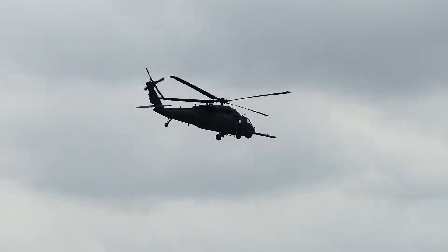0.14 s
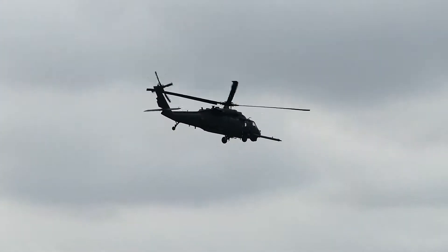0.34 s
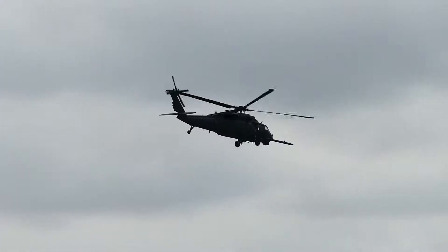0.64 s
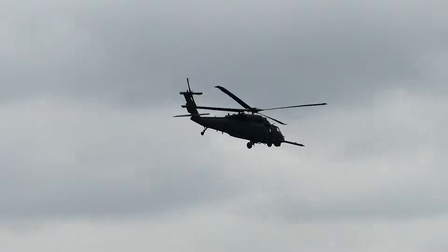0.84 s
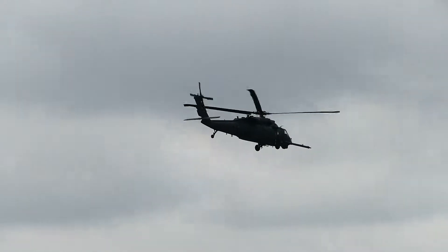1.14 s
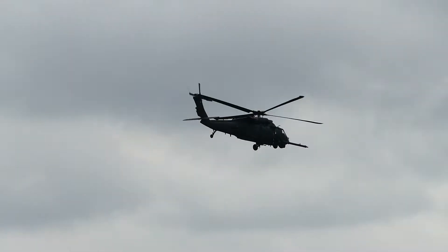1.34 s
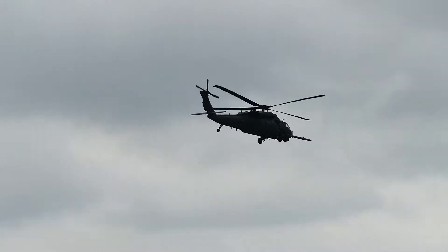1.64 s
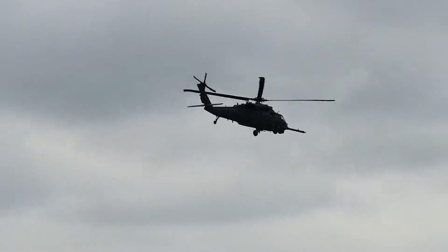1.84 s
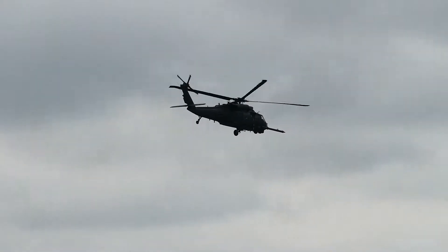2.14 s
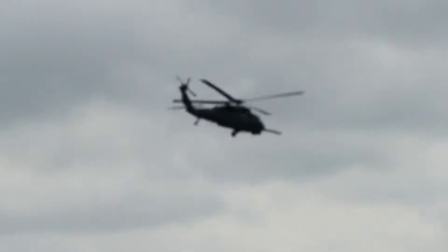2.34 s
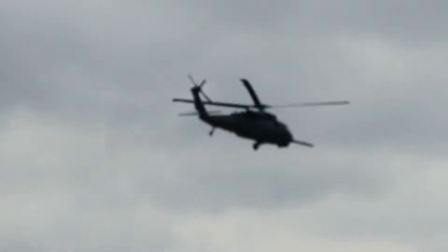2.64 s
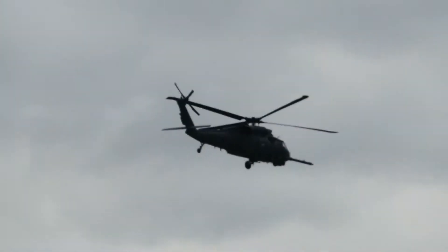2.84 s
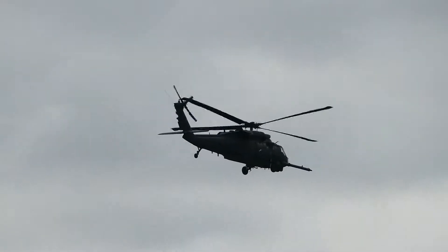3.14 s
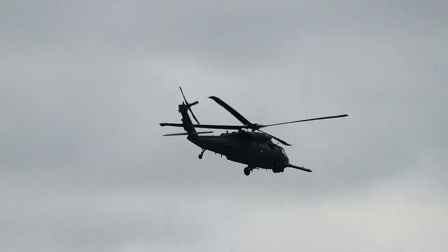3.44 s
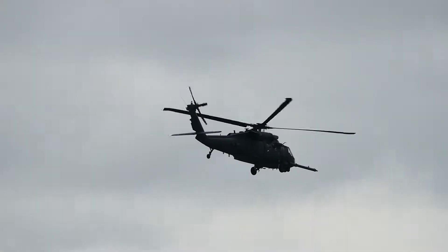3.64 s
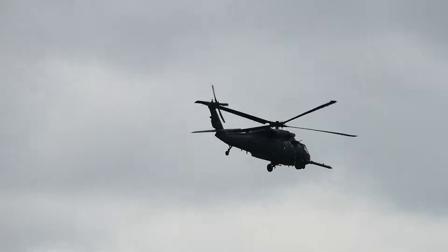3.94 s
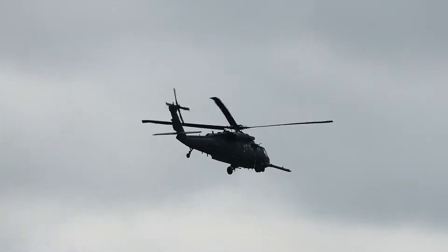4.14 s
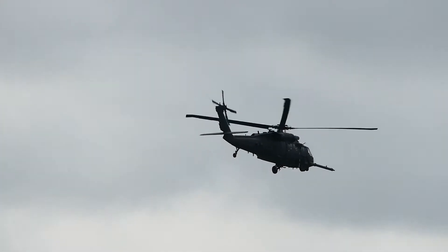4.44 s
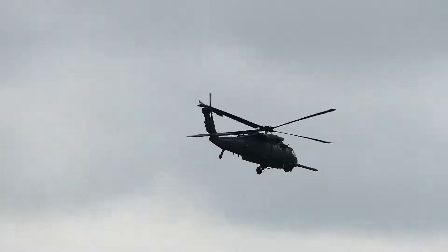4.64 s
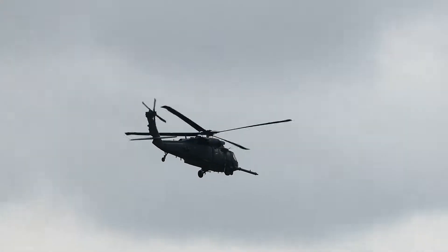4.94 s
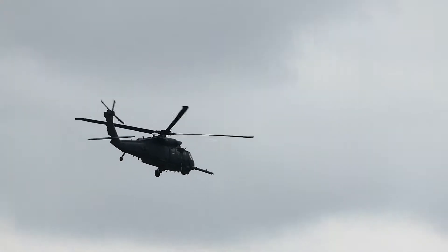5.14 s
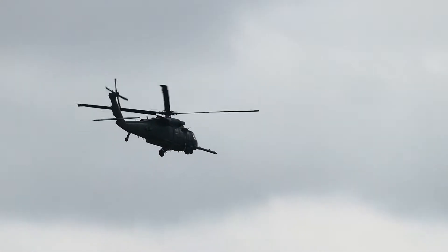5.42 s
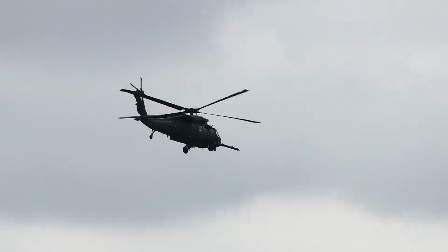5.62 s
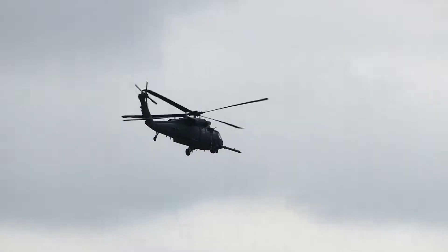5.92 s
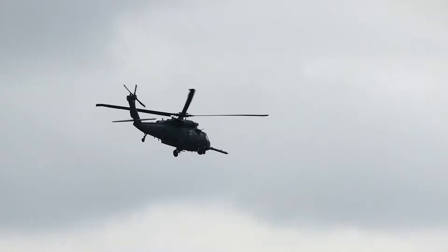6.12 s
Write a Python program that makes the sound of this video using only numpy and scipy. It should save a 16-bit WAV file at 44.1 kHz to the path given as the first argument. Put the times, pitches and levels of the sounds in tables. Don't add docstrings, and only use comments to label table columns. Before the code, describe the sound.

A helicopter's rotor roar throbs steadily and fades outdoors, with faint whines, blade slaps, nearby camera shutter clicks and a sharp knock of a zoom stop.

```python
import sys
import numpy as np
from scipy import signal
from scipy.fft import rfft, irfft, next_fast_len
from scipy.io import wavfile

SR = 44100
rng = np.random.default_rng(int(sys.argv[2]) if len(sys.argv) > 2 else 0)


def natural_amplitude(level_db):
    exponent = np.asarray(level_db, float) / 20
    return 10 ** exponent


def digitize_waveform(pressure):
    field = np.atleast_2d(pressure).T
    bounded = np.clip(field, -1, 1)
    quanta = np.round(bounded * 32767).astype(np.int16)
    wavfile.write(sys.argv[1], SR, quanta)


N = 276948

# time in seconds, roar level in dB, clearness in dB.
AIR_PATH = [(0, -21.5, -0.5), (.14, -22.5, -0.5), (.3, -19, -1), (.48, -22, 0), (.7, -25, -1.5),
            (1.05, -24.5, 2), (1.32, -23.5, -5), (1.85, -22.5, 4), (2.5, -25, 0.5), (3.2, -29, 1),
            (3.9, -21, 1), (4.11, -21.5, -0.5), (4.18, -28, -2), (4.36, -33, 9), (4.6, -33, 3.5),
            (5.05, -32.5, 3), (5.55, -24.5, -0.5), (6.28, -24.5, -2.5)]
AIR_MEAN_DB, MIDDLE_S = -26.5, 3.14
# pitch in Hz, level in dB per Hz.
ROAR_COLOUR = [(100, -60), (150, -39), (200, -17.5), (240, -9.5), (290, -5.5), (340, 1), (520, 0),
               (680, -5), (800, -6.5), (1370, -9), (2030, -15.5), (2500, -22.5), (4200, -25.5), (4900, -36),
               (6000, -49.5), (7200, -64.5), (9000, -96.5)]
# pitch in Hz, share of fading, share of clearness,
# change with distance in dB per second, change in the shadow in dB.
AIR_RESPONSE = [(250, 0.65, 0.01, -2, -25), (418, 0.88, 0.01, 0.08, -0.5), (617, 0.88, .15, -.5, -6.5),
                (746, 0.63, 0.22, -0.2, -8.5), (1220, 0.93, 1, -0.1, 3.5), (2000, 0.6, 0.89, 0.23, -2.5),
                (3300, 0.7, 0.59, -0.24, 7), (4180, 0.23, 0.37, 0.1, -1.5), (5630, 0.3, 0.5, -0.5, -2.5)]
# time in seconds, half length in seconds, lift in dB.
TREBLE_EDDIES = [(.42, .1, 3), (.8, 0.1, 1), (1.1, .08, -2), (1.35, 0.13, 3), (2.25, 0.065, 0),
                 (2.55, 0.29, -1), (3.5, .15, -0.5), (4.72, 0.088, -1.5), (5.2, .1, -2), (5.5, 0.23, 3),
                 (5.95, 0.21, -3)]
# time in seconds, half length in seconds, lift in dB.
LOW_EDDIES = [
    (.05, .15, -2),
    (.45, 0.083, 2),
    (1.1, 0.084, 0),
    (1.55, 0.36, 3),
    (4.1, .06, 0),
    (4.35, .1, 5.5),
    (5.3, .2, 3),
    (5.75, 0.6, -3),
]
BASS_TOP_HZ = 480
# time in seconds, half length in seconds,
# pitch in Hz, half width in octaves, lift in dB.
ROAR_PATCHES = [(1.85, 0.2, 2550, 0.36, -2.5), (2, .15, 1600, .2, -1), (3.98, .1, 390, .3, -2),
                (1.8, .15, 760, .25, 2.5), (1.1, .12, 560, .25, 3), (5.7, .12, 260, .25, -4),
                (2.33, .15, 780, 0.33, 3.5), (2.25, .15, 1650, .3, 2.5), (1.9, 0.13, 270, .3, -1),
                (4.4, .2, 1800, .2, 2.5), (4.4, 0.29, 3150, .2, 4.5), (5.2, .2, 500, .8, 0.5),
                (4.78, .1, 680, .25, -6), (4.6, .08, 700, .25, -5), (4.75, .1, 1900, .3, -4),
                (4.72, .08, 270, .3, 15), (7.6, .12, 240, .2, -4), (5.2, .3, 3400, 0.39, -3),
                (6.0, .2, 260, .3, 2), (6.0, .2, 620, 0.27, -2), (0.27, .15, 640, 0.33, 0),
                (1.25, .15, 1200, 0.28, 4.5), (0.15, .15, 510, 0.28, 1)]
# time in seconds, half length in seconds, change in dB.
INTAKES_COVERED = [
    (2.95, 0.46, -18),
]
INTAKE_HZ, INTAKE_OCTAVES, INTAKE_SHARE = 3800, 0.11, 0.44
HAZE_FROM_S, HAZE_DB_PER_S = 4.26, -5


def roar(patch_db, flicker_db, flutter_db, treble_lead):
    shaped, hz, size = coloured(ROAR_COLOUR)
    roar_db, clear_db = in_time(AIR_PATH)
    clear_db = clear_db + swells(TREBLE_EDDIES)
    bass_db = swells(LOW_EDDIES)
    law_hz, *laws = np.transpose(AIR_RESPONSE)
    depth_db = in_time(BLADE_THROB)[1] * natural_amplitude(3.0 * drift(7.0))
    turns, elapsed, shade = blade_turns(), seconds() - MIDDLE_S, shadow()
    haze_db = HAZE_DB_PER_S * np.maximum(seconds() - HAZE_FROM_S, 0)
    hidden_db = INTAKE_SHARE * swells(INTAKES_COVERED)
    pockets_db = np.array([swells([(s, half, db)]) for s, half, at_hz, octaves, db in ROAR_PATCHES])
    pocket_hz, pocket_octaves = np.transpose(ROAR_PATCHES)[2:4]
    out, gust, neighbour = np.zeros(N), drift(30.0), drift(4.0)
    for centre in 100 * 2 ** np.arange(0, 6.5, 1 / 3):
        window = np.cos(np.pi / 2 * np.clip(3 * np.log2(hz / centre), -1, 1)) ** 2
        fades, clears, loses, shaded_db = (np.interp(np.log(centre), np.log(law_hz), law) for law in laws)
        path_db = fades * (roar_db - AIR_MEAN_DB) + clears * clear_db
        path_db += loses * elapsed + shaded_db * shade
        path_db += np.clip(2 * np.log2(centre / INTAKE_HZ), 0, 1) * haze_db
        path_db += np.exp(-(np.log2(centre / INTAKE_HZ) / INTAKE_OCTAVES) ** 2) * hidden_db
        path_db += np.clip(2 * np.log2(BASS_TOP_HZ / centre) + 1, 0, 1) * bass_db
        path_db += np.exp(-(np.log2(centre / pocket_hz) / pocket_octaves) ** 2) @ pockets_db
        treble = np.clip(np.log2(centre / 650), 0, 2)
        throb_db = depth_db * (1 - 0.39 * treble) * np.cos(2 * np.pi * (turns + treble_lead * treble))
        own = drift(1.9)
        flutter = np.roll(gust, int(40 * centre))
        air_db = patch_db * (own + neighbour) + flicker_db * gust + flutter_db * flutter
        out += natural_amplitude(path_db + throb_db + air_db) * irfft(shaped * window, size)[:N]
        neighbour = own
    return natural_amplitude(AIR_MEAN_DB - 1.0) * out


# time in seconds, lead in blade periods, throb depth in dB.
BLADE_THROB = [(0, .12, 1.2), (1, .27, 1.6), (2, .4, 1.2), (3, .5, .8), (4, .47, 1.0), (5, .35, 1.2),
               (6.28, .17, .9)]
BLADE_HZ = 16.2


def blade_turns():
    return BLADE_HZ * seconds() + in_time(BLADE_THROB)[0]


SHADOW_S, SHADOW_FALL_S, SHADOW_HOLD_S, SHADOW_LIFT_S = 4.64, 0.045, 0.15, 1


def shadow():
    after = seconds() - SHADOW_S
    lift = 1 - (after - SHADOW_HOLD_S) / SHADOW_LIFT_S
    return np.clip(np.minimum(after / SHADOW_FALL_S, lift), 0, 1)


# time in seconds, first gap in Hz, strength from 0 to 1.
GROUND_ECHO = [(0, 655, 0.06), (.55, 670, 0.15), (.9, 783, 0.26), (1.5, 857, 0.17), (2, 825, 0),
               (2.5, 950, 0.09), (3.1, 930, 0.15), (3.7, 968, 0.2), (4.0, 900, 0.22), (4.5, 942, 0.18),
               (4.7, 792, 0.06), (5.3, 870, 0.15), (5.9, 805, 0.14), (6.28, 670, .2)]


def ground(x, dull_hz):
    gap_hz, strength = in_time(GROUND_ECHO)
    dull = signal.sosfilt(signal.butter(1, dull_hz, fs=SR, output="sos"), x)
    lag = SR / gap_hz - SR / (2 * np.pi * dull_hz)
    echo = np.interp(np.arange(N) - lag, np.arange(N), dull)
    return (x - strength * echo) / np.sqrt(1 + strength ** 2)


# side-on level in dB, share of fading, change tail-on in dB.
WHINE_LEVELS = [
    (-34.5, 1.75, -3),
    (-51.5, 0.13, 0),
    (-59.5, 0.3, 5),
]
# pitch in Hz, width in Hz.
WHINE_PITCHES = [
    (592, 81),
    (2700, 220),
    (4300, 190),
]
# side-on level in dB, share of fading, change tail-on in dB.
EXHAUST_LEVELS = [
    (-63.5, 0.14, 24),
    (-56, 0.1, 14.5),
    (-64, 0.43, 14),
]
# pitch in Hz, width in Hz.
EXHAUST_PITCHES = [
    (450, 57),
    (1260, 200),
    (1480, 210),
]
TURN_S, TURN_TAKES_S = 2.33, 0.16


def whines(pitches, levels):
    fading_db = in_time(AIR_PATH)[0] - AIR_MEAN_DB
    tail_on = (1 + np.tanh((seconds() - TURN_S) / TURN_TAKES_S)) / 2
    out = []
    for (hz, width), (side_db, fades, turn_db) in zip(pitches, levels):
        level_db = side_db + fades * fading_db + turn_db * tail_on + 0.28 * drift(7.8)
        out.append(natural_amplitude(level_db) * narrow_noise(hz, width))
    return out


# pitch in Hz, width in Hz, level in dB, loudest time in seconds, # half length in
# seconds.
PASSING_HUMS = [(347, 40, -37.5, 1.1, 0.62), (944, 22, -40.5, 0.48, 0.77), (1120, 90, -36, .95, 0.25),
                (1817, 220, -40, 0.74, 0.35), (1857, 190, -39, 1.45, 0.25), (2040, 130, -42, 1.95, 0.17),
                (1376, 140, -38.5, 2.9, 0.56), (2134, 100, -44.5, 4, 0.1), (1280, 130, -46.5, 5.5, 0.2),
                (1260, 140, -37.5, 6.7, 0.25), (3270, 120, -52, 1.8, 0.46), (1000, 220, -39.5, .4, .12),
                (930, 180, -41.5, 6.2, .12)]


def passing_hums():
    out = np.zeros(N)
    for hz, width, db, s, half in PASSING_HUMS:
        swell = np.exp(-((seconds() - s) / half) ** 2)
        out += natural_amplitude(db) * swell * narrow_noise(hz, width)
    return out


# multiple of the tail blade rate, level in dB rms.
TAIL_TONES = [
    (1, -72.5),
    (2, -59.5),
    (3, -42.5),
    (4, -44.5),
]
# time in seconds, level in dB.
TAIL_LEVEL = [(0, -2), (2.1, -3.5), (2.6, -10), (6.28, -32)]
TAIL_HZ = 75.4


def tail_rotor():
    turns = np.cumsum(TAIL_HZ * (1 + .002 * drift(1.5))) / SR
    hum = np.zeros(N)
    for multiple, db in TAIL_TONES:
        tone = np.sqrt(2) * np.sin(2 * np.pi * multiple * turns)
        hum += natural_amplitude(db + 1.8 * drift(2.5)) * tone
    return natural_amplitude(in_time(TAIL_LEVEL)[0]) * hum


# time in seconds, peak in dB.
WAKE_SLAPS = [(0.009, -11), (0.096, -8), (0.118, -17), (0.163, -19), (0.201, -10.5), (0.243, -8.5),
              (0.304, -13), (0.339, -17), (0.402, -20), (0.484, -17), (0.547, -15), (0.604, -17),
              (0.667, -15), (0.735, -13.5), (0.844, -15), (0.957, -16), (1.047, -12.5), (1.072, -14),
              (1.152, -15.5), (1.214, -17), (1.64, -14), (1.749, -10), (1.894, -19), (2.074, -13),
              (3.92, -22), (4.005, -18), (4.104, -16)]
SLAP_HZ, SLAP_WIDTH_HZ, SLAP_RISE_S, SLAP_DB = 599, 56, .004, -6.5


def slaps():
    pushes = np.zeros(N)
    for s, peak_db in WAKE_SLAPS:
        pushes[round(s * SR)] = natural_amplitude(peak_db + SLAP_DB)
    rung = resonate(pushes + 1e-18, SLAP_HZ, SLAP_WIDTH_HZ)
    softened = resonate(rung, SLAP_HZ, 1 / SLAP_RISE_S)
    return softened * SR / (2 * np.pi * SLAP_WIDTH_HZ) * 2


# time in seconds, peak in dB, pitch in Hz.
EXHAUST_CRACKS = [(0.0618, -19, 1050), (0.2324, -17, 1165), (0.2823, -16, 964), (0.3257, -16, 1060),
                  (0.3556, -17, 1040), (0.404, -19.5, 1200), (0.4753, -13, 1160), (0.6579, -20, 969),
                  (0.6913, -20, 953), (0.7233, -20, 999), (0.9123, -20, 1110), (0.9632, -12.5, 1110),
                  (1.0944, -20, 1100), (1.1458, -18, 1220), (1.4551, -21.5, 1060), (1.502, -21.5, 1120),
                  (1.5668, -20.5, 1096), (1.6462, -20.5, 1130), (1.8816, -13, 993), (1.9455, -16.5, 1010),
                  (2.0014, -15, 1270), (2.1335, -18.5, 1410), (2.1829, -16, 950), (2.5411, -20.5, 1350),
                  (2.6778, -22, 1340), (2.7232, -18.5, 1330), (2.8779, -20.5, 1250), (2.9128, -21, 1290),
                  (2.9592, -22.5, 1250), (3.0076, -20.5, 1160), (3.0759, -21.5, 1490),
                  (3.1687, -19.5, 1370), (3.2839, -24, 1330), (3.3633, -21, 940), (3.475, -20.5, 960),
                  (3.5468, -19.5, 1420), (3.7304, -15.5, 1435), (4.1061, -12.5, 1230),
                  (4.2273, -22.5, 1120), (4.3435, -19, 1260), (4.4164, -19, 1520), (4.4817, -21.5, 1540),
                  (4.5176, -23.5, 1430), (4.7277, -24, 1240), (4.8638, -25, 1240), (5.228, -20, 1220),
                  (5.2769, -21.5, 1420), (5.3248, -21.5, 1320), (5.3911, -19.5, 1260), (5.5423, -17, 1355),
                  (5.7304, -18, 1220), (5.9903, -22.5, 1280)]
CRACK_WIDTH_HZ, CRACK_DB = 260, -4.5
# time in seconds, peak in dB, pitch in Hz.
TAIL_THUMPS = [(2.166, -19, 458), (2.312, -20, 563), (2.382, -14, 410), (2.783, -16.5, 370),
               (2.926, -19, 377), (3.102, -19, 374), (3.297, -20, 458), (3.343, -20, 476),
               (3.391, -17.5, 388), (3.461, -15, 414), (3.546, -13, 610), (3.593, -20, 498),
               (3.675, -21.5, 466), (3.739, -15, 474), (3.78, -10.5, 557), (3.891, -14, 528),
               (3.956, -11.5, 371), (4.005, -12, 458), (4.235, -20, 366), (4.296, -19, 470),
               (4.463, -16, 460), (4.681, -30, 470), (5.334, -23, 406), (5.397, -22, 560),
               (5.437, -14, 504), (5.559, -18, 560), (5.674, -22, 584), (5.714, -22, 510),
               (5.783, -14.5, 600), (5.838, -17, 586), (5.888, -19.5, 466), (5.987, -21, 425),
               (6.043, -18, 458), (6.115, -21, 410), (6.2, -25, 458), (6.245, -18, 490)]
THUMP_WIDTH_HZ, THUMP_DB = 82, -7
# time in seconds, peak in dB.
TIP_SNAPS = [
    (3.909, -27.5),
    (3.9544, -29),
    (4.1044, -28.5),
    (4.2316, -29.5),
    (4.2959, -27),
    (4.3535, -26),
    (4.4095, -29),
    (4.6074, -29.5),
    (4.7274, -33.5),
]
TIP_LOW_HZ, TIP_HIGH_HZ, TIP_T60_S, TIP_DB = 1800, 4200, 0.021, -3


def cracks():
    span = np.arange(2000) / SR
    out = np.zeros(N + len(span))
    low_cut = signal.butter(2, TIP_LOW_HZ, "high", fs=SR, output="sos")
    top_cut = signal.butter(8, TIP_HIGH_HZ, fs=SR, output="sos")
    band = np.vstack([low_cut, top_cut])
    for s, peak_db in TIP_SNAPS:
        puff = rng.standard_normal(len(span)) * natural_amplitude(-60 * span / TIP_T60_S)
        at = round(s * SR)
        out[at:at + len(span)] += natural_amplitude(peak_db + TIP_DB) * signal.sosfilt(band, puff)
    exhaust_cracks = rings(EXHAUST_CRACKS, CRACK_WIDTH_HZ, CRACK_DB)
    return out[:N] + exhaust_cracks + rings(TAIL_THUMPS, THUMP_WIDTH_HZ, THUMP_DB)


def rings(events, width_hz, lift_db):
    span = np.arange(2000) / SR
    out = np.zeros(N + len(span))
    decay = np.pi * width_hz * span
    envelope = np.e * decay * np.exp(-decay)
    for s, peak_db, hz in events:
        at = round(s * SR)
        out[at:at + len(span)] += natural_amplitude(peak_db + lift_db) * envelope * np.sin(2 * np.pi * hz * span)
    return out[:N]


RELEASES = [
    .0687,
    .4068,
    .7447,
]
# seconds after release, peak in dB, share of low modes in dB,
# time to die by 60 dB in seconds.
SHUTTER_CYCLE = [(0, -45, -13, 0.016), (0.015, -37.5, -3, 0.012), (.0225, -41, 1, 0.012),
                 (.03, -59, -2, .015), (0.043, -36, -1.5, 0.011), (0.0516, -43.5, -2.5, 0.012),
                 (.062, -54, 0, 0.071), (.071, -50, -2, 0.011), (.080, -53, 0, 0.033),
                 (.085, -38.5, -3, 0.012), (.098, -57, -4, 0.021), (0.105, -48, -4.5, .012)]
# pitch in Hz, width in Hz, level in dB.
CAMERA_MODES = [(4020, 570, 19), (4800, 960, 15), (5720, 510, 12), (8730, 500, 0.5), (10100, 600, 0),
                (11200, 800, -2.5), (12500, 1000, -12), (14300, 1500, -19)]


def camera():
    events = [(s + lag, *rest) for s in RELEASES for lag, *rest in SHUTTER_CYCLE]
    return ticks(events, CAMERA_MODES, lift_db=6.5, snap=2.2)


# time in seconds, peak in dB, share of low modes in dB,
# time to die by 60 dB in seconds.
BUTTON_CLICKS = [(1.6228, -35, -3, 0.012), (1.742, -44, -15, 0.01), (1.7506, -44, 8.5, 0.0073),
                 (1.9609, -43.5, -3, 0.012), (1.974, -64, -8.5, 0.01), (2.1495, -56, -18, 0.01),
                 (2.2465, -40.5, -8, 0.011), (2.2495, -30, -12, 0.022), (2.3054, -37, -24, 0.01),
                 (2.3316, -37.5, -5, 0.01), (2.3464, -48.5, -11, 0.01), (2.9687, -39.5, -38, 0.01),
                 (3.0097, -46, -11, 0.0087), (3.2744, -57, -12.5, 0.01), (4.4707, -46, -9, 0.013),
                 (4.8145, -48, -16, 0.0092), (5.2565, -59.5, -8.5, 0.01), (5.2653, -62.5, 7.5, 0.011)]
# time in seconds, peak in dB, share of low modes in dB,
# time to die by 60 dB in seconds.
STOP_RATTLE = [
    (3.1692, -41, -12, .02),
    (3.1812, -26, -25, .011),
    (3.1855, -23, -25, .004),
]
# pitch in Hz, width in Hz, level in dB.
CASING_MODES = [(3400, 1550, 15.5), (4740, 560, 4.5), (5970, 380, 4), (9500, 590, -9.5), (9950, 830, 3.5),
                (10800, 980, 1.5), (13050, 2000, -9), (15000, 1800, -14.5)]
# pitch in Hz, level in dB per Hz.
RUB_COLOUR = [(5000, -44), (6900, -33.5), (7700, -28.5), (8600, -5), (9800, -2.5), (11000, -4.5),
              (12500, -8.5), (15000, -19), (16500, -24.5)]
# time in seconds, half length in seconds, rise in dB.
HAND_RUBS = [
    (1.72, 0.14, 6.1),
    (1.85, .04, 8),
    (2.05, .1, 9),
    (2.3, 0.11, 8),
    (3.75, 0.44, 2),
    (4.22, 0.041, 4),
]
HISS_DB = -77
# pitch in Hz, level in dB per Hz.
MOTOR_COLOUR = [(5000, -42.5), (6400, -11.5), (7200, -16.5), (7800, -25), (8800, -6), (9800, -5),
                (10500, 2), (11300, -11), (12400, -9), (13200, -13), (14000, -15), (14800, -12.5),
                (15800, -19), (17000, -29.5)]


def recorder_body():
    rubs = natural_amplitude(HISS_DB + swells(HAND_RUBS) + .7 * drift(15.0)) * hiss(RUB_COLOUR)
    motor = zoom_gain() * natural_amplitude(.7 * drift(25.0)) * hiss(MOTOR_COLOUR)
    clicks = ticks(BUTTON_CLICKS + STOP_RATTLE, CASING_MODES, lift_db=3.5, snap=5.8)
    return rubs + motor + clicks + snaps(low_hz=2000, high_hz=11540)


# start in seconds, end in seconds, level in dB.
MOTOR_RUNS = [
    (1.627, 1.701, -60.5),
    (2.403, 3.173, -62),
    (3.166, 3.196, -55),
    (3.199, 3.288, -67.5),
]
ZOOM_EDGE_S, ZOOM_KICK_DB, ZOOM_KICK_S = 0.006, 2, 0.031


def zoom_gain():
    t = seconds()
    gain = np.zeros(N)
    for start, end, level_db in MOTOR_RUNS:
        ramp = np.clip(np.minimum(t - start, end - t) / ZOOM_EDGE_S, 0, 1)
        kick_db = ZOOM_KICK_DB * np.exp(-np.abs(t - start) / ZOOM_KICK_S)
        gain += ramp * natural_amplitude(level_db + kick_db)
    return gain


# time in seconds, peak in dB.
LATCH_SNAPS = [
    (1.624, -37),
    (1.75, -43),
    (2.2481, -28),
    (2.9693, -30.5),
    (4.47, -53),
]
# time in seconds, peak in dB.
END_STOP = (3.1857, -10.5)
PORT_GAP_HZ, PORT_GAP_WIDTH_HZ, PORT_GAP_SHARE = 6960, 4100, 0.85


def snaps(low_hz, high_hz):
    knocks = np.zeros(N)
    for s, peak_db in LATCH_SNAPS + [END_STOP]:
        knocks[round(s * SR)] = natural_amplitude(peak_db + 4.0)
    band = signal.butter(2, [low_hz, high_hz], "band", fs=SR, output="sos")
    wide = signal.sosfilt(band, knocks + 1e-18)
    return wide - PORT_GAP_SHARE * resonate(wide, PORT_GAP_HZ, PORT_GAP_WIDTH_HZ)


SPLIT_HZ, TICK_RISE_S = 7600, 0.0011


def ticks(events, modes, lift_db, snap):
    span = 4000
    out = np.zeros(N + span)
    t = np.arange(span) / SR
    for s, peak_db, low_db, t60 in events:
        burst = rng.standard_normal(span)
        burst[0] = snap
        burst *= natural_amplitude(-60 * t / max(t60, .004))
        burst[1:] *= np.minimum(t[1:] / TICK_RISE_S, 1)
        rung = np.zeros(span)
        for hz, width, db in modes:
            share_db = low_db if hz < SPLIT_HZ else 0
            rung += natural_amplitude(db + share_db) * resonate(resonate(burst, hz, width), hz, width)
        at = round(s * SR)
        out[at:at + span] += natural_amplitude(peak_db + lift_db) * rung
    return out[:N]


# pitch in Hz, level in dB per Hz.
WIND_COLOUR = [(25, -66), (50, -49), (80, -28), (110, -18.5), (165, -6), (200, -6), (300, -19.5),
               (600, -65.5)]
# time in seconds, half length in seconds, rise in dB.
WIND_GUSTS = [
    (2.5, .1, 2.7),
    (3.65, 0.079, 3.5),
    (4.15, 0.081, 7.4),
    (4.6, 0.42, 5.9),
    (6.28, 0.13, 1.8),
]
WIND_DB, WIND_RISE_DB_PER_S = -57, 0.5


def wind():
    level_db = WIND_DB + WIND_RISE_DB_PER_S * seconds() + swells(WIND_GUSTS) + 2.5 * drift(3.3)
    return natural_amplitude(level_db) * hiss(WIND_COLOUR)


def hiss(spectrum):
    shaped, hz, size = coloured(spectrum)
    return irfft(shaped, size)[:N]


def coloured(spectrum):
    size = next_fast_len(N)
    hz = np.maximum(np.arange(size // 2 + 1) * SR / size, 1)
    point_hz, point_db = np.transpose(spectrum)
    colour_db = np.interp(np.log(hz), np.log(point_hz), point_db)
    shaped = rfft(rng.standard_normal(size)) * natural_amplitude(colour_db)
    return shaped / np.std(irfft(shaped, size)), hz, size


def narrow_noise(hz, width):
    return rms_one(resonate(resonate(rng.standard_normal(N), hz, width), hz, width))


def resonate(x, hz, width):
    r = np.exp(-np.pi * width / SR)
    top = np.array([1, 0, -1]) * (1 - r * r) / 2
    return signal.lfilter(top, [1, -2 * r * np.cos(2 * np.pi * hz / SR), r * r], x)


def rms_one(x):
    return x / np.sqrt(np.mean(x ** 2) + 1e-20)


def seconds():
    return np.arange(N) / SR


def in_time(rows):
    s, *columns = np.transpose(rows)
    return [np.interp(seconds(), s, c) for c in columns]


def swells(events):
    return sum(rise_db * np.exp(-((seconds() - s) / half) ** 2) for s, half, rise_db in events)


def drift(rate):
    r = np.exp(-80 * np.pi * rate / SR)
    noise = rng.standard_normal(N // 40 + 2002)
    slow = signal.lfilter([1], [1, -2 * r, r * r], noise)[2000:]
    return np.interp(np.arange(N) / 40, np.arange(len(slow)), rms_one(slow))


def scene():
    rotor = roar(patch_db=0.69, flicker_db=0.48, flutter_db=1.2, treble_lead=0.17)
    helicopter = ground(rotor, dull_hz=3470) + tail_rotor()
    chop = natural_amplitude(1.2 * in_time(BLADE_THROB)[1] * np.cos(2 * np.pi * blade_turns()))
    duct, gearbox, turbine = whines(WHINE_PITCHES, WHINE_LEVELS)
    turbine = natural_amplitude(swells(INTAKES_COVERED)) * turbine
    exhaust = sum(whines(EXHAUST_PITCHES, EXHAUST_LEVELS))
    helicopter += chop * (duct + gearbox + turbine + exhaust + passing_hums())
    helicopter += slaps() + cracks()
    return (helicopter + camera() + recorder_body() + wind())[None]


def roll_off(x):
    return signal.sosfilt(signal.butter(12, 15830, fs=SR, output="sos"), x)


DUCK_S, DUCK_DB, DUCK_ATTACK_S, DUCK_RELEASE_S = 4.625, -4.5, 0.008, 0.52


def record(dry):
    after = np.maximum(seconds() - DUCK_S, 0)
    dip = np.minimum(after / DUCK_ATTACK_S, 1) * np.exp(-after / DUCK_RELEASE_S)
    ducked = dry * natural_amplitude(DUCK_DB * dip)
    treble = signal.butter(4, 10500, "high", fs=SR, output="sos")
    self_noise = natural_amplitude(-81.5) * signal.sosfilt(treble, rng.standard_normal(dry.shape))
    top_cut = signal.cheby2(12, 60, 16430, fs=SR, output="sos")
    mix = signal.sosfilt(top_cut, ducked + self_noise)
    return roll_off(mix)


dry = scene()
out = record(dry)
digitize_waveform(out)
```